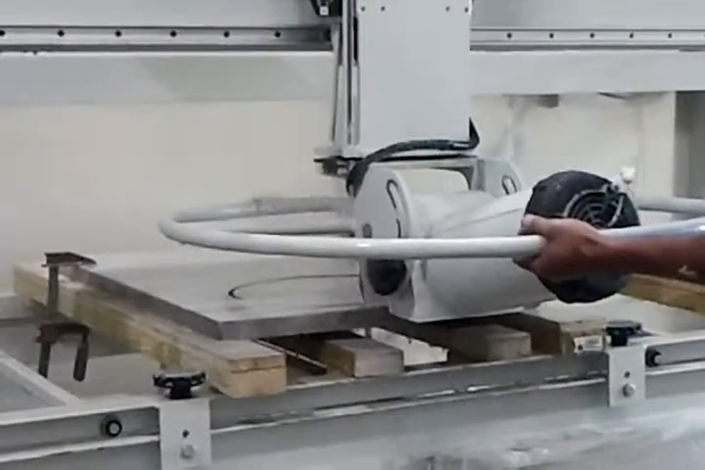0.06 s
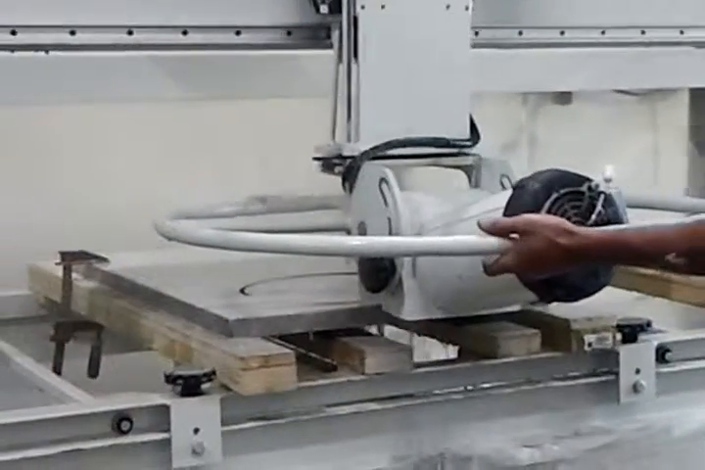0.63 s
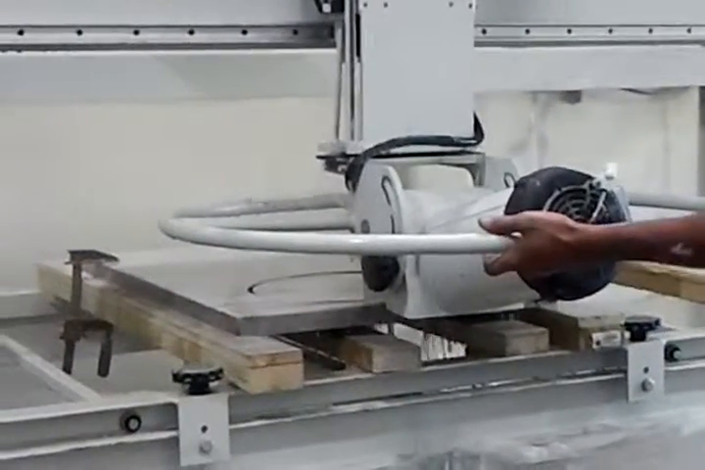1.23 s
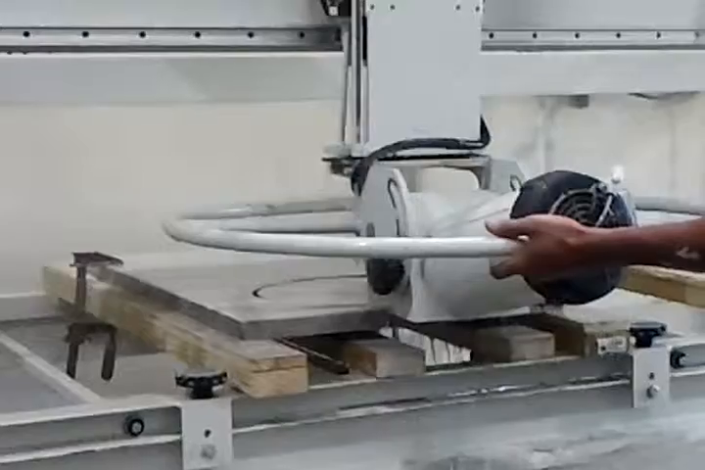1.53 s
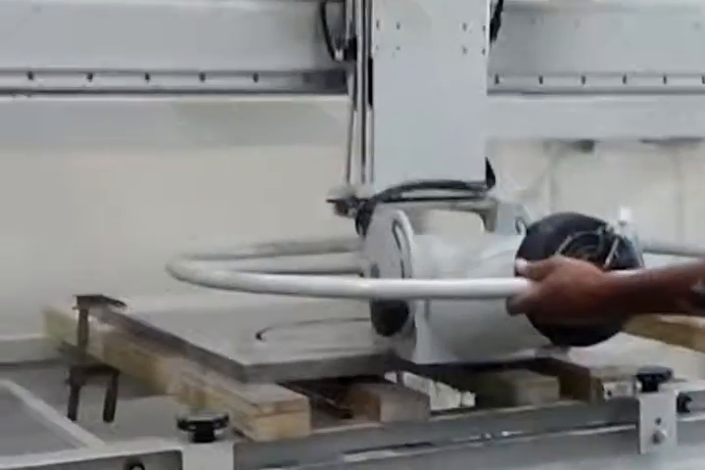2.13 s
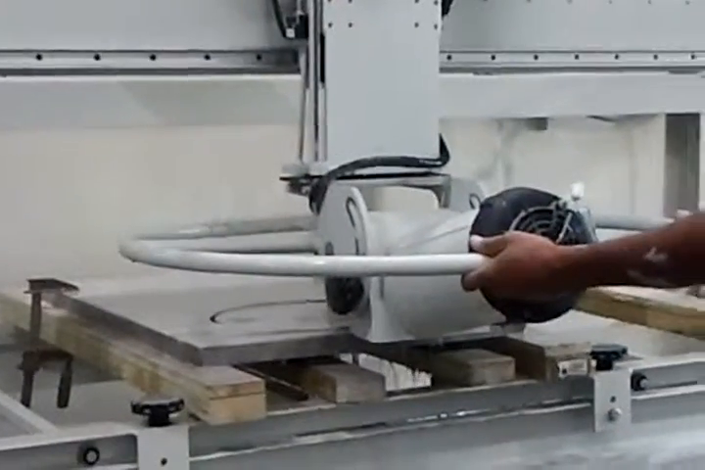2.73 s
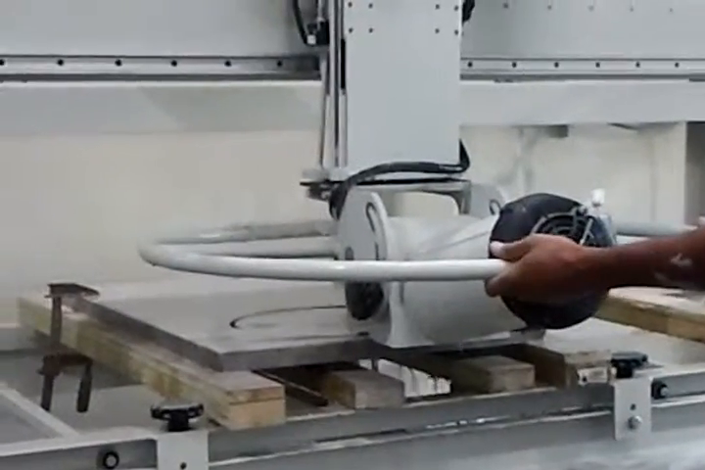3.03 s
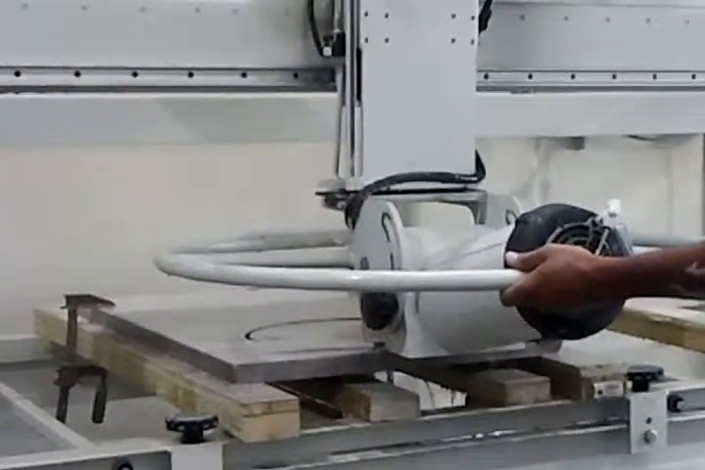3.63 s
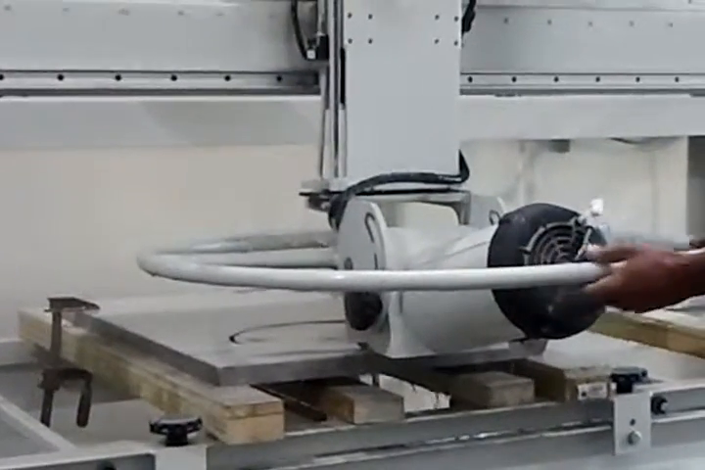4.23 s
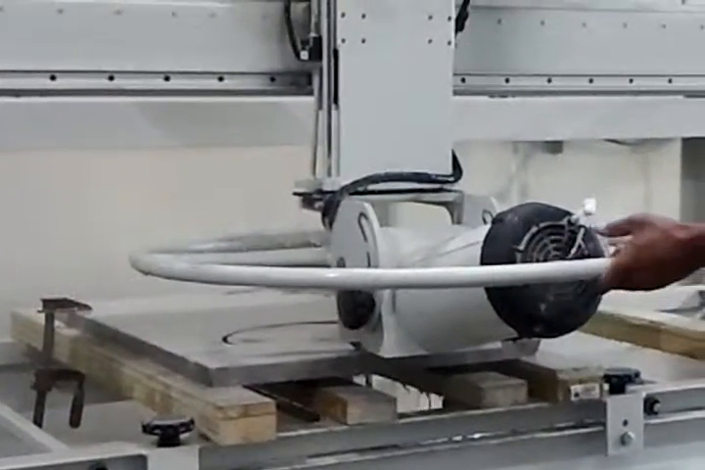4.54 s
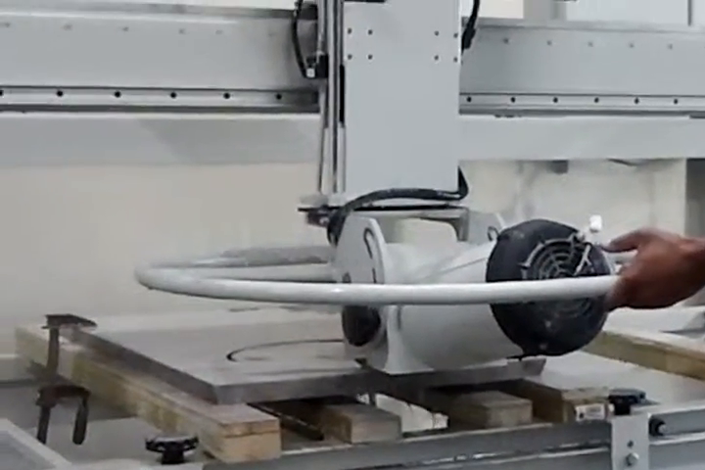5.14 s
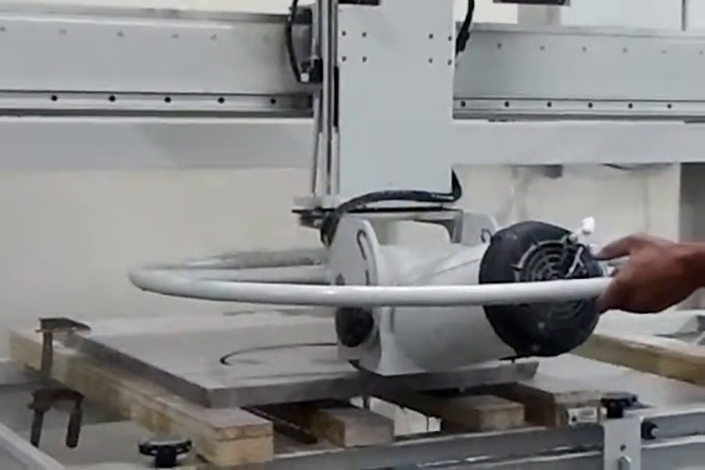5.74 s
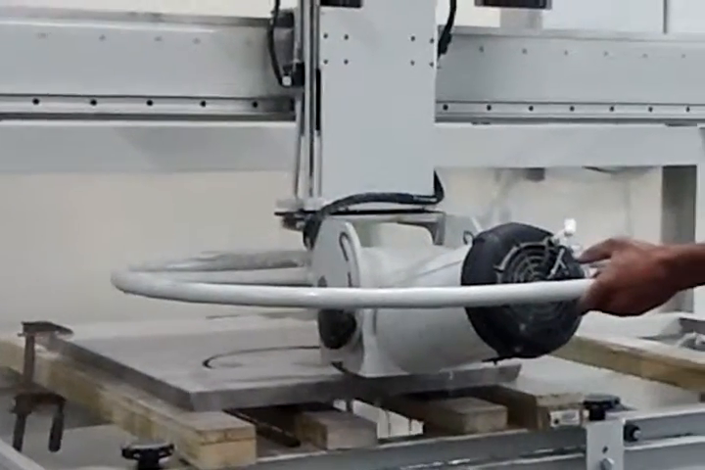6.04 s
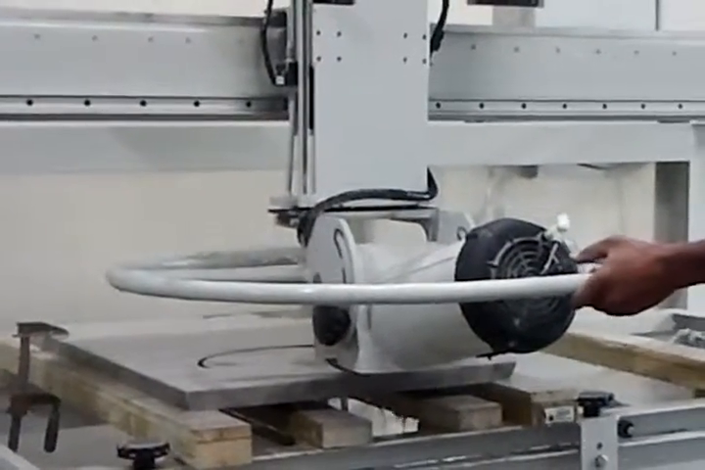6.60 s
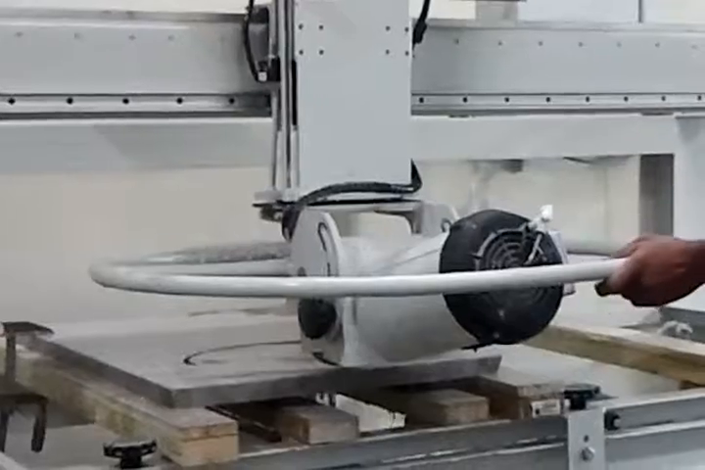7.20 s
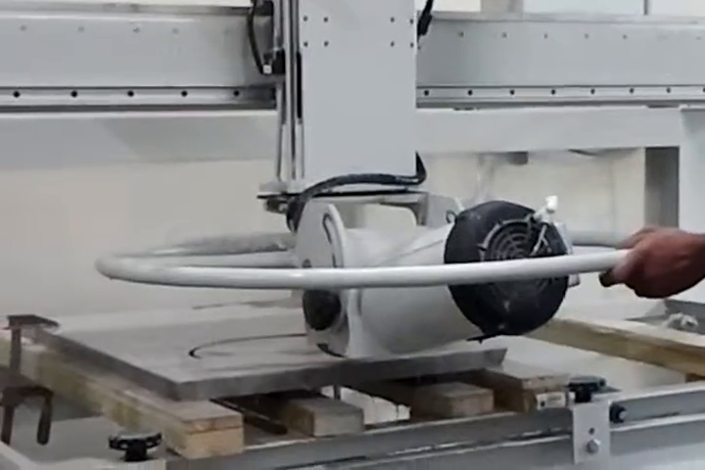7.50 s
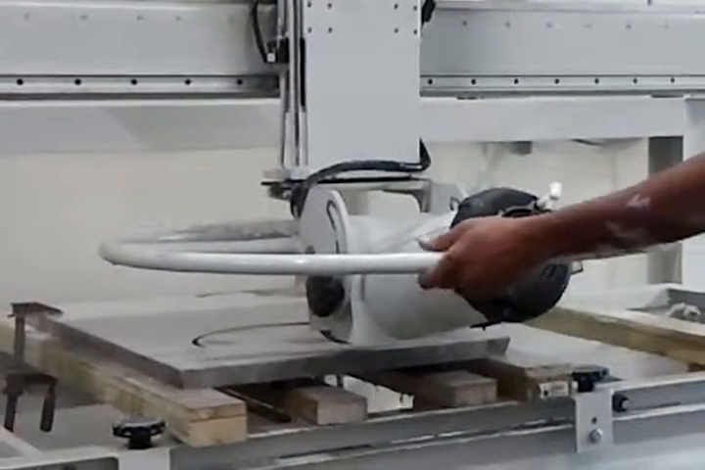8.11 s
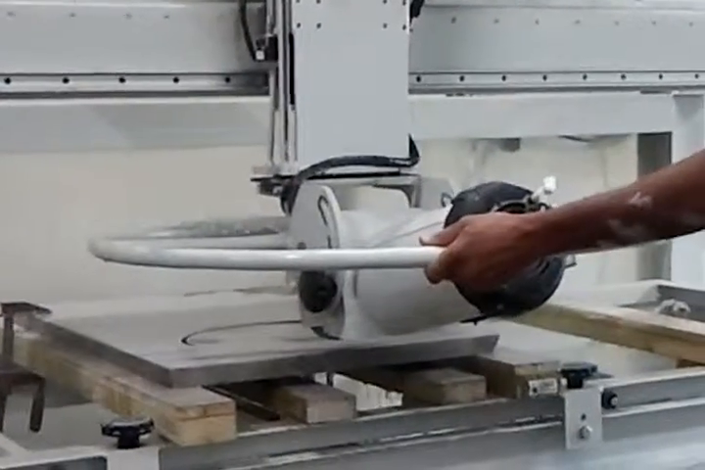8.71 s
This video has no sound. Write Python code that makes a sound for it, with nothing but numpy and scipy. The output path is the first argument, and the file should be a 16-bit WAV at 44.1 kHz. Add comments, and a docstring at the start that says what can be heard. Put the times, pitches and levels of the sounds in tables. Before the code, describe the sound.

A stone-cutting machine opens with a gritty, screeching grind that dies away within about a second, leaving its rushing, whining fan and motor hum. The tool then rubs the slab with a dense buzz, which builds into several pushes of shrill chatter. The cutting stops and the motor runs on freely. The workshop sound comes through a single microphone with limited treble, and the loudest moments are squashed.

```python
"""Harsh grinding and screeching: a hand-guided motor spindle bites into a stone slab in a workshop.
It runs free, then rubs the stone once a turn and breaks into a squealing chatter, the tool vibrating
against the slab, until it is eased off. Its cooling fan whines and rushes throughout over the motor's
hum. One narrow-band microphone picks it up, and a fast limiter holds down the loud passages."""
import sys
import numpy as np
from scipy import signal
from scipy.fft import rfft, irfft
from scipy.io import wavfile
from scipy.ndimage import uniform_filter1d, minimum_filter1d

SR = 44100
rng = np.random.default_rng(int(sys.argv[2]) if len(sys.argv) > 2 else 0)


def wav_out(sig):
    """Save sig, one row per channel (or a flat mono array), as 16-bit PCM at SR to the path in sys.argv[1]."""
    wavfile.write(sys.argv[1], SR, np.round(np.clip(np.atleast_2d(sig).T, -1, 1) * 32767).astype(np.int16))


N = 395136

# spindle speed, sagging under load: time_s, turns_per_s
SPINDLE_SPEED = [(0, 78.3), (.5, 78.3), (.65, 79.15), (.85, 79.43), (4.3, 79.4), (4.7, 79.27), (5.1, 79.43),
                 (8.96, 79.45)]
FREE_TURN_HZ = SPINDLE_SPEED[-1][1]
# hard pushes of the tool into the stone: start_s, end_s, level_db
GRIND_PUSHES = [(-.2, 0.496, -4), (.5, 0.79, -11.5)]
GRIND_ATTACK_S, GRIND_RELEASE_S = .05, .15  # per 10 dB


def grinding(turn_memory=.42):
    """Grit tears at the stone; each turn meets the ripples left by the last."""
    # spectrum of the grit: frequency_hz, density_db
    grit_colour = [(150, -56), (450, -21.5), (900, -19.5), (1700, -12.5), (2000, -4.5), (2250, 0.5),
                   (2900, -1.5), (3550, -4), (3850, -2.5), (4700, -6), (5300, -5.5), (5850, -5),
                   (6400, -11.5), (7500, -24)]
    level_db = pushed_db(GRIND_PUSHES, GRIND_ATTACK_S, GRIND_RELEASE_S)
    grit = noise(grit_colour)
    lag = round(SR / SPINDLE_SPEED[0][1])  # one turn under load
    for i in range(lag, N - lag, lag):
        grit[i:i + lag] -= turn_memory * grit[i - lag:i]
    lift_db = .5 - .11 * np.maximum(level_db, GRIND_PUSHES[-1][2])  # more force sounds duller
    return from_db(level_db) * lift_treble(rms_one(grit), lift_db, corner_hz=3400)


def flaring_modes(turns, flare_db=3.5, wander_hz=14, throb=.44):
    """The grinding feeds modes of tool and slab; each flares up by chance, pumped by each turn."""
    # modes, relative to the grinding: pitch_hz, level_db
    modes = [(2230, -14), (2470, -12.5), (3800, -19.5), (4600, -16.5), (5630, -21.5), (6220, -27)]
    level_db = pushed_db(GRIND_PUSHES, GRIND_ATTACK_S, GRIND_RELEASE_S)
    out = 0
    for hz, db in modes:
        cycles = np.cumsum(hz + wander_hz * drift(40)) / SR
        ring = tone(cycles, level_db + db + flare_db * drift(7))
        out += ring * pumping(turns + rng.random(), throb)
    return out


def screeches(turns, wander_hz=8, throb=.45, flicker_db=2.5):
    """Single modes swell and die, unsteady in pitch and pumped by each turn."""
    # the loudest screeches: start_s, end_s, pitch_hz, level_db
    events = [(-.1, 0.208, 2848, -6), (.16, 0.286, 4830, -11.5), (0.304, 0.513, 2390, -12.5),
              (0.664, 0.902, 3080, -18), (0.659, 0.874, 4585, -21), (0.699, 0.946, 2446, -20),
              (2.921, 3.65, 4587, -25.5), (4.8, 5.02, 4587, -22), (4.9, 5.3, 5520, -27),
              (5.6, 6.08, 5938, -23.5)]
    out = np.zeros(N)
    for start, end, hz, db in events:
        at = slice(max(int(start * SR), 0), int(end * SR))
        progress = (np.arange(N)[at] / SR - start) / (end - start)
        swell = np.sqrt(np.abs(np.sin(np.pi * progress))) * pumping(turns[at] + rng.random(), throb)
        cycles = np.cumsum(hz + wander_hz * drift(35)[at]) / SR
        gain = from_db(db + flicker_db * drift(14)[at])
        out[at] += np.sqrt(2) * gain * swell * np.sin(2 * np.pi * cycles)
    return out


def chatter_contact(rest_db=-7, settle_s=.2):
    """Level, bite and slab ring settle to each new push; between pushes the chatter rings on."""
    # pushes that make the tool chatter: start_s, end_s, level_db, bite (0-1), ring_lift_db
    pushes = [(3.045, 3.73, 1, 0.05, 0), (3.807, 4.522, -1, 0.11, 4.5), (4.6, 4.952, 5, 0.93, -0.5),
              (5.0, 5.167, -2, 0.49, 1.5), (5.497, 5.766, -3.5, 0.03, 6), (5.8, 5.896, -2.5, .1, -2)]
    start, end, _, bite, ring_db = np.transpose(pushes)
    level_db = pushed_db([*pushes, (start[0], end[-1], rest_db)], attack_s=.11, release_s=.17)
    nearest = np.searchsorted((end[:-1] + start[1:]) / 2, np.arange(N) / SR)
    span = round(settle_s * SR)
    return level_db, uniform_filter1d(bite[nearest], span), uniform_filter1d(ring_db[nearest], span)


def chatter(turns, cycles_per_turn=30.745, stiffening_hz=5, wander_hz=.85, ring_hz=2200, width_hz=49):
    """The tool vibrates on its own against the stone; turning splits tone and octave into sidebands."""
    # sidebands of the chatter tone: offset_turn_rates, light_touch_db, full_bite_db
    sidebands = [(-4, -25, -30.5), (-3, -18.5, -21.5), (-2, -31.5, -35), (-1, -29.5, -34.5),
                 (0, -17.5, -21), (1, -18, -18.5), (2, -23, -17), (3, -27.5, -26.5), (4, -34.5, -22),
                 (7, -35, -24), (8, -29, -16.5), (9, -23.5, -21.5), (10, -27.5, -18.5), (11, -24.5, -23),
                 (17, -30.5, -30), (23, -41.5, -32), (26, -32, -39.5), (27, -33.5, -31.5), (40, -28.5, -32),
                 (43, -32.5, -27), (49, -44.5, -40)]
    # sidebands of its octave: offset_turn_rates, light_touch_db, full_bite_db
    octave_sidebands = [(1, -38.5, -25.5), (6, -40, -28.5), (7, -33, -26.5), (8, -37, -24), (9, -31, -23),
                        (10, -32.5, -33), (11, -37, -32.5), (12, -32.5, -25.5), (17, -43.5, -27)]
    # drone of the loaded spindle, relative to the chatter: turn_multiple, level_db
    drone = [(8, -37), (9, -36.5)]
    # spectrum of the weak sidebands and grit: frequency_hz, level_db
    colour = [(600, -34), (1700, -16), (2300, 5), (3300, -4.5), (4200, 0), (5200, -2), (5700, -1),
              (6300, -11.5), (6600, -8), (7400, -12)]
    level_db, bite, ring_db = chatter_contact()
    # a deeper bite stiffens the contact and raises the pitch
    shift_hz = stiffening_hz * bite + wander_hz * (1 + bite) * drift(10.5)
    cycles = cycles_per_turn * turns + np.cumsum(shift_hz) / SR
    out = 0
    for harmonic, table in enumerate((sidebands, octave_sidebands), 1):
        for offset, light_db, full_db in table:
            hz = (harmonic * cycles_per_turn + offset) * FREE_TURN_HZ
            near_ring = 1 / (1 + ((hz - ring_hz) / width_hz) ** 2)  # the slab's lowest resonance
            line_db = light_db + bite * (full_db - light_db) + near_ring * ring_db
            out += tone(harmonic * cycles + offset * turns, line_db, waver_db=.8 * harmonic)
    # the turns also drive that resonance directly: this beats against the nearest sideband
    out += tone(round(ring_hz / FREE_TURN_HZ) * turns, ring_db - 23)
    out += (1 - bite) * sum(tone(order * turns, db) for order, db in drone)
    # weak sidebands spread far to both sides, offset from the turn multiples by the chatter's slip
    slip = cycles - np.floor(cycles_per_turn) * turns
    out += from_db(-23.5) * comb(turns, slip, colour, uneven_db=-.5)
    out += from_db(-25 + 3 * bite) * comb(turns, 2 * slip - turns, colour, uneven_db=2)
    grit = from_db(-27.5) * noise(colour)
    # the contact pumps as the chatter slips in and out of step, until a full bite steadies it
    throb_db = -.3 * (1 - bite) * np.cos(2 * np.pi * (turns - slip))
    return from_db(level_db + throb_db) * (out + grit)


def rubbing(turns):
    """The tool's high side brushes the stone once a turn: a dense buzz with a few ringing lines."""
    # the tool grazes, rests on the stone and slides off: start_s, end_s, level_db
    touches = [(2.4, 2.7, -23.5), (2.72, 5.9, -22), (5.95, 6.07, -19)]
    # spectrum of the buzz: frequency_hz, line_db
    buzz_colour = [(400, -35), (700, -13), (1100, -5.5), (1750, -3), (2400, 2.5), (2900, -3), (3250, 2),
                   (3700, 1), (5000, -4.5), (5800, 1), (6300, -7.5), (6600, -15), (7200, -16)]
    # ringing of the slab, relative to the rubbing: turn_multiple, level_db
    slab_lines = [(24, -12.5), (29, -13.5), (31, -12), (41, -10.5), (79, -18)]
    buzz = comb(turns, 0, buzz_colour, uneven_db=4.5)
    rings = sum(tone(order * turns, db, waver_db=3.5) for order, db in slab_lines)
    return from_db(pushed_db(touches, attack_s=.07, release_s=.052)) * (buzz + rings)


def motor(turns, blades=11, sag_db_per_hz=6):
    """Fan blades whine, their lowest tone weakening under load, over motor hum and bearing tones."""
    # fan whine: blade_rate_multiple, level_db
    blade_tones = [(1, -27), (2, -36.5), (3, -30)]
    # motor hum: turn_multiple, level_db
    hum_tones = [(3, -70.5), (4, -58), (5, -59.5), (6, -43.5), (12, -39.5), (13, -39.5), (14, -35.5),
                 (15, -41.5), (18, -38), (19, -36), (26, -34.5), (29, -36), (30, -44), (44, -36.5),
                 (53, -39.5), (55, -50.5)]
    # bearing tones, out of step with the turns: free_running_pitch_hz, level_db
    bearing_tones = [(263.8, -52.5), (4651, -40.5)]
    sag_db = sag_db_per_hz * (FREE_TURN_HZ - spindle_hz())
    whine = 0
    for harmonic, db in blade_tones:
        order = harmonic * blades
        whine += tone(order * turns, db + swing_db(order) - sag_db * (harmonic == 1))
    hum = sum(tone(order * turns, db + swing_db(order), waver_db=1.9) for order, db in hum_tones)
    bearing = sum(tone(hz * turns / FREE_TURN_HZ, db, waver_db=1.4) for hz, db in bearing_tones)
    return whine + hum + bearing


def swing_db(order):
    """A motor tone swells and fades as the head is swung and its beam sweeps past the microphone."""
    # passes of a beam: turn_multiple, middle_s, half_width_s, rise_db
    sweeps = [(11, 1.7, 2.6, 3), (33, 2.36, .8, 8.5), (14, 2.75, 0.24, 6.5), (33, 4.1, 0.82, 8.5),
              (22, 7.49, 1.3, 13.5), (33, 9.04, 0.76, 7)]
    t = np.arange(N) / SR
    return sum(rise_db * np.exp(-((t - middle) / width) ** 2)
               for multiple, middle, width, rise_db in sweeps if multiple == order)


def fan_rush(turns, level_db=-18, throb=.068):
    """Air torn through the fan cowl, throbbing a little with each turn; its treble slowly eases."""
    # spectrum of the air: frequency_hz, density_db
    air_colour = [(100, -61.5), (190, -43.5), (250, -27), (600, -16.5), (780, -6), (950, -6), (1330, -3),
                  (1540, 2.5), (1780, -3), (2600, -2), (4700, -8), (5800, -14.5), (6500, -22.5),
                  (7400, -38.5)]
    air = lift_treble(noise(air_colour), lift_db=np.linspace(.95, -.13, N), corner_hz=2800)
    return from_db(level_db) * air * pumping(turns, throb)


def frame_bump(start_s=2.14, pitch_hz=140, level_db=-33, t60_s=.07):
    """One soft, dull knock of the frame: a low mode that dies quickly."""
    age = np.maximum(np.arange(N) / SR - start_s, 0)
    return from_db(level_db) * np.exp(-np.log(1000) * age / t60_s) * np.sin(2 * np.pi * pitch_hz * age)


def spindle_hz():
    """Turns per second at every sample."""
    return np.interp(np.arange(N) / SR, *np.transpose(SPINDLE_SPEED))


def pushed_db(pushes, attack_s, release_s):
    """Each push rises 10 dB per attack_s, holds, and falls 10 dB per release_s; the strongest rules."""
    t = np.arange(N) / SR
    levels = [db - 10 * (np.maximum(start - t, 0) / attack_s + np.maximum(t - end, 0) / release_s)
              for start, end, db, *_ in pushes]
    return np.maximum(np.max(levels, axis=0), -120)


def pumping(turns, depth):
    """A gain that swings about 1 once a turn."""
    return 1 + depth * np.sin(2 * np.pi * turns)


def tone(cycles, level_db, waver_db=.8):
    """A sine on a running phase; its level wavers as the paths through the room shift."""
    angle = 2 * np.pi * (cycles % 1 + rng.random())
    return from_db(level_db + waver_db * drift(4.3)) * np.sin(angle) * np.sqrt(2)


def comb(turns, carrier, colour, uneven_db, count=96, size=4096):
    """Lines one turn rate apart: a slowly changing pattern repeats each turn on a carrier; rms 1."""
    orders, out = np.arange(count), 0
    position = (turns % 1 * size).astype(int) % size
    gains = colour_gain(colour, orders * FREE_TURN_HZ) * (orders > 4)
    for share in (1, drift(1.8) / 2, drift(5.5) / 2):
        lines = gains * from_db(uneven_db * rng.standard_normal(count))
        pattern = np.fft.ifft(lines * np.exp(2j * np.pi * rng.random(count)), size)
        out += share * rms_one(pattern)[position]
    return rms_one((out * np.exp(2j * np.pi * carrier)).real)


def drift(rate_hz, step=200):
    """Slow random wander of rms about 1: smoothed noise at coarse steps, joined by straight lines."""
    pole = np.exp(-2 * np.pi * step * rate_hz / SR)
    white = rng.standard_normal(N // step + 1002)
    slow = rms_one(signal.lfilter([1], [1, -2 * pole, pole * pole], white)[1000:])
    return np.interp(np.arange(N) / step, np.arange(len(slow)), slow)


def noise(colour):
    """Coloured noise of rms 1."""
    hz = np.arange(N // 2 + 1) * SR / N
    return rms_one(irfft(rfft(rng.standard_normal(N)) * colour_gain(colour, hz), N))


def colour_gain(colour, hz):
    """Read a spectrum on a log-frequency axis."""
    points_hz, points_db = np.transpose(colour)
    return from_db(np.interp(np.log(hz + 1e-9), np.log(points_hz), points_db))


def lift_treble(x, lift_db, corner_hz):
    """A shelf whose height moves in time."""
    treble = signal.sosfiltfilt(signal.butter(2, corner_hz, "high", fs=SR, output="sos"), x)
    return x + (from_db(lift_db) - 1) * treble


def from_db(db):
    """Decibels to gain."""
    return 10 ** (db / 20)


def rms_one(x):
    """Scale to rms 1."""
    return x / np.sqrt(np.mean(np.abs(x) ** 2) + 1e-20)


def scene():
    """Tool and fan follow the angle of the one spindle; the light contact wavers with the hand."""
    turns = np.cumsum(spindle_hz() + .025 * drift(8.3)) / SR
    pressure_db = 1.5 * drift(4)
    hard_cut = grinding() + flaring_modes(turns) + screeches(turns)
    light_cut = from_db(pressure_db) * rubbing(turns) + from_db(pressure_db / 2) * chatter(turns)
    return (hard_cut + light_cut + motor(turns) + fan_rush(turns) + frame_bump())[None]


def record(dry):
    """A narrow-band mono microphone, a very fast look-ahead limiter whose tips just clip, a top cut."""
    mic_top_hz, cutoff_hz = 7450, 15850
    threshold, reaction_s, excess_share, clip_level = .77, .00085, .85, .782
    heard = signal.sosfilt(signal.butter(14, mic_top_hz, fs=SR, output="sos"), dry)
    span = 2 * round(reaction_s * SR / 2) + 1
    wanted_gain = (threshold / np.maximum(np.abs(heard), threshold)) ** excess_share
    gain = uniform_filter1d(minimum_filter1d(wanted_gain, span), span)
    limited = np.clip(heard * gain, -clip_level, clip_level)
    return signal.sosfilt(signal.ellip(10, .1, 80, cutoff_hz, fs=SR, output="sos"), limited)


dry = scene()
out = record(dry)
wav_out(out)
```